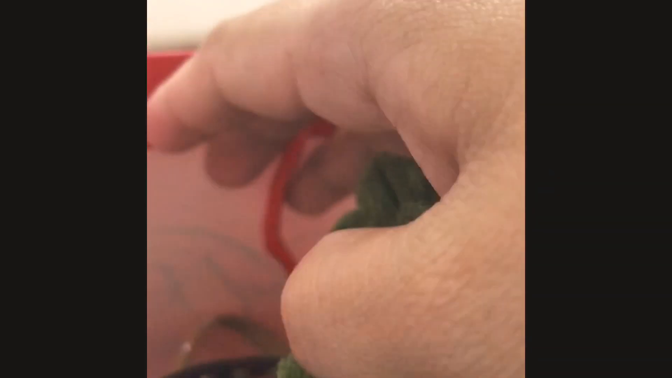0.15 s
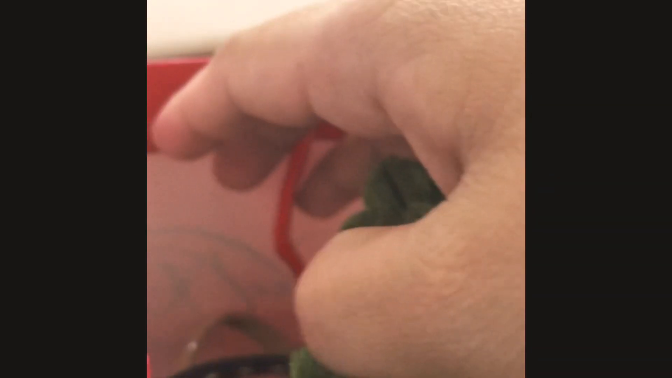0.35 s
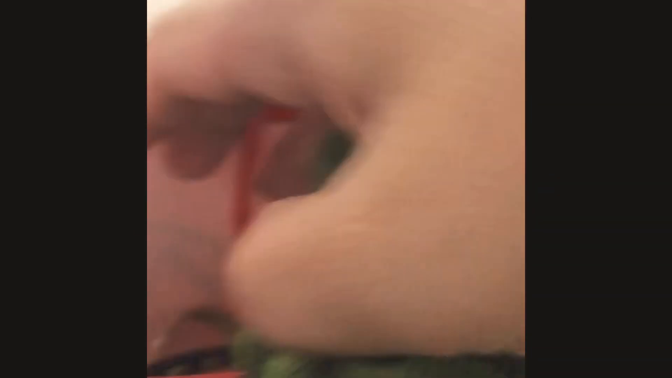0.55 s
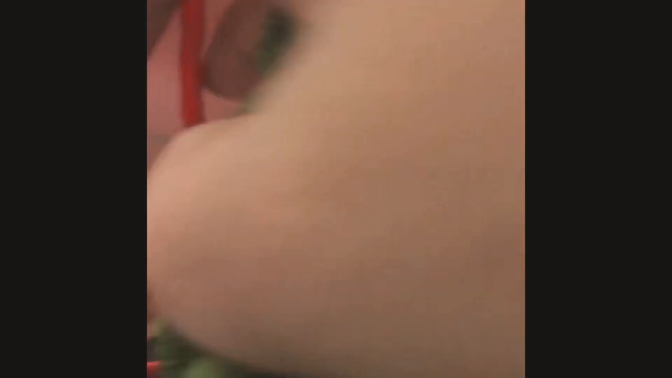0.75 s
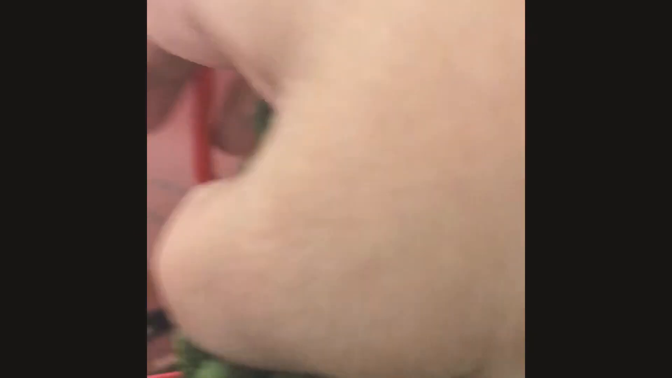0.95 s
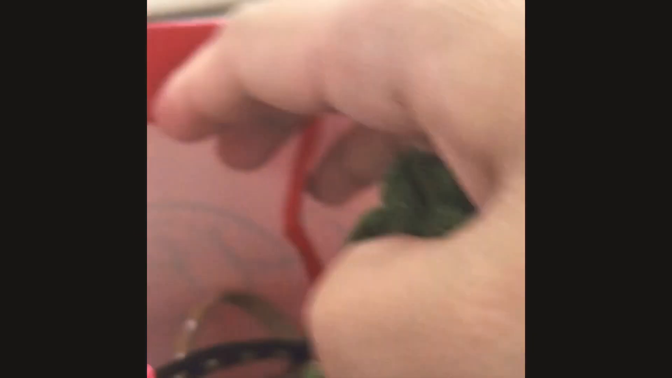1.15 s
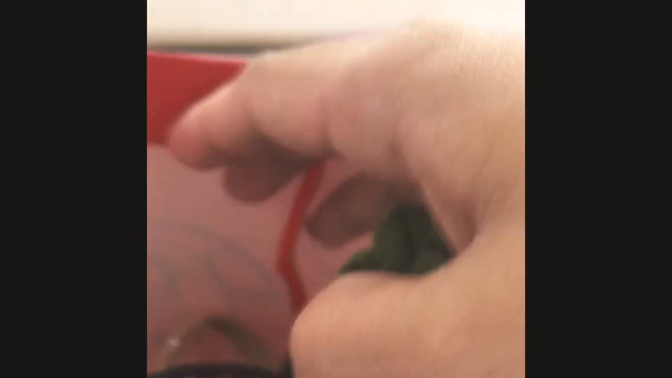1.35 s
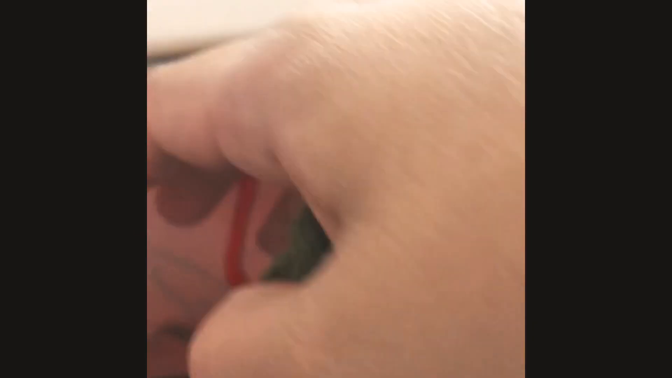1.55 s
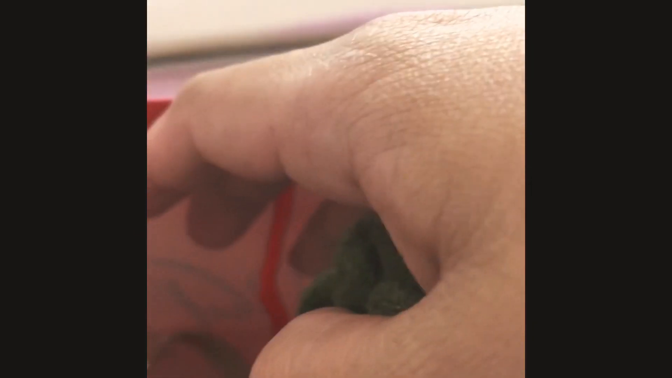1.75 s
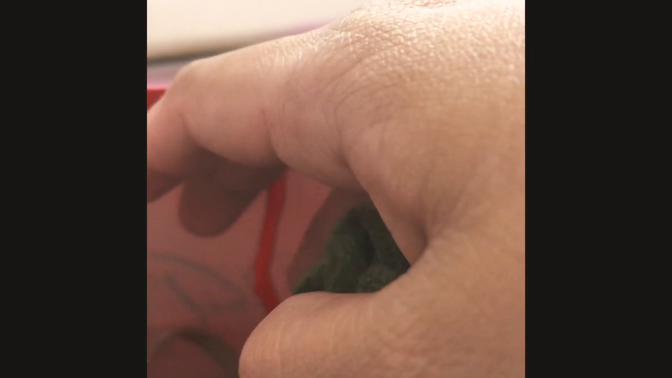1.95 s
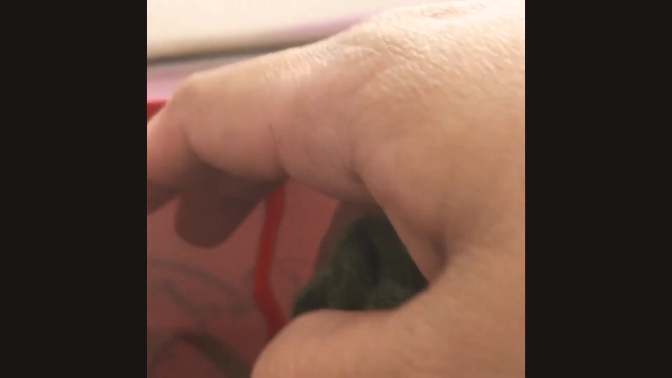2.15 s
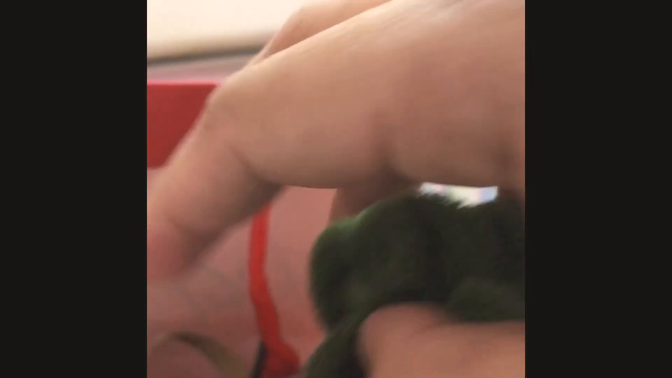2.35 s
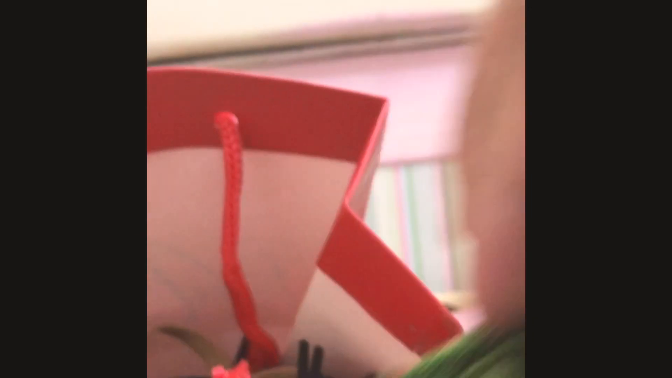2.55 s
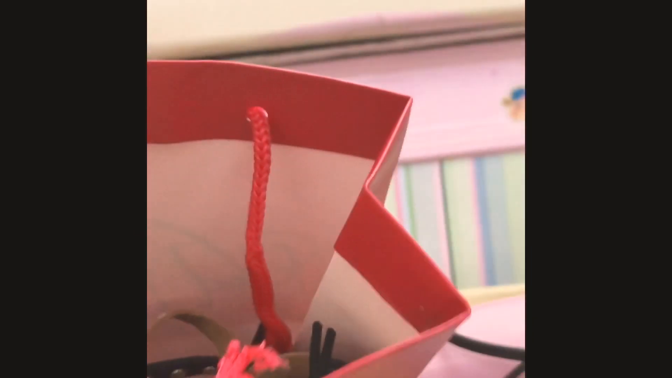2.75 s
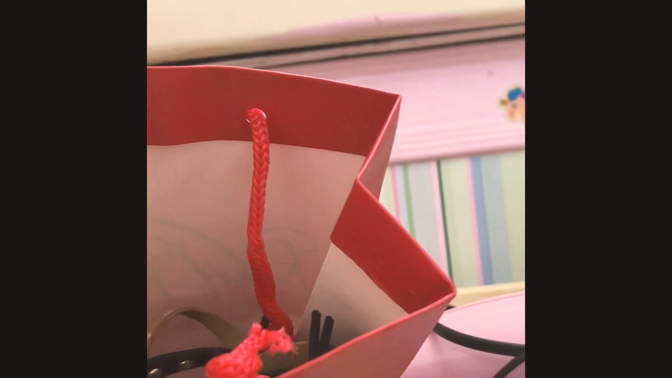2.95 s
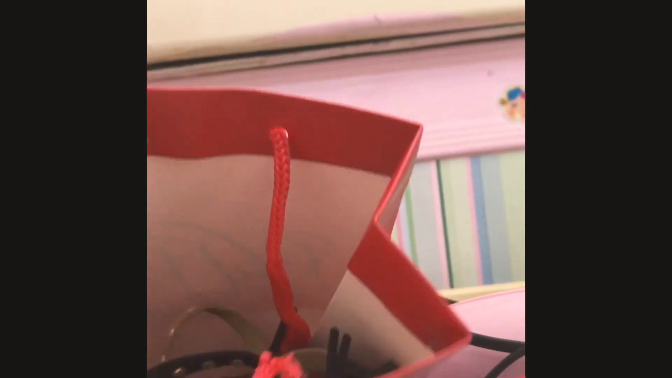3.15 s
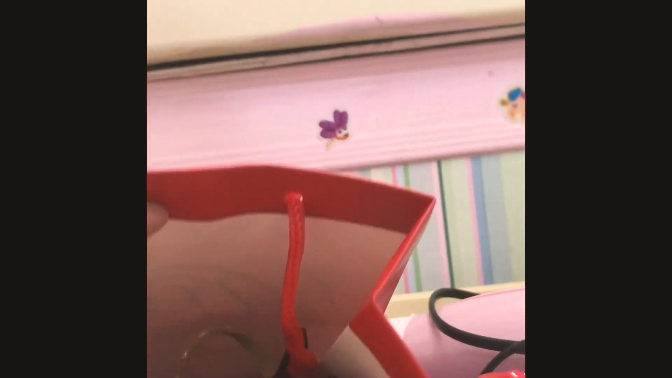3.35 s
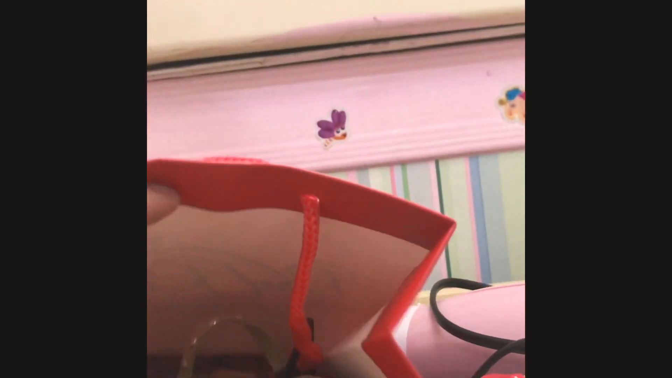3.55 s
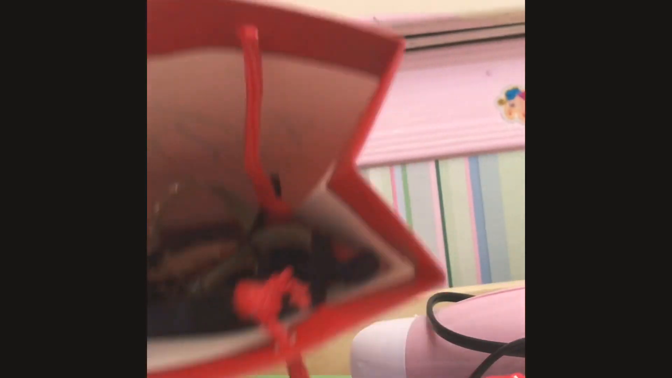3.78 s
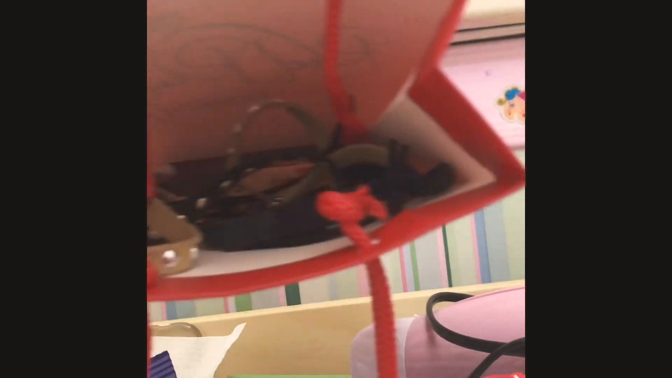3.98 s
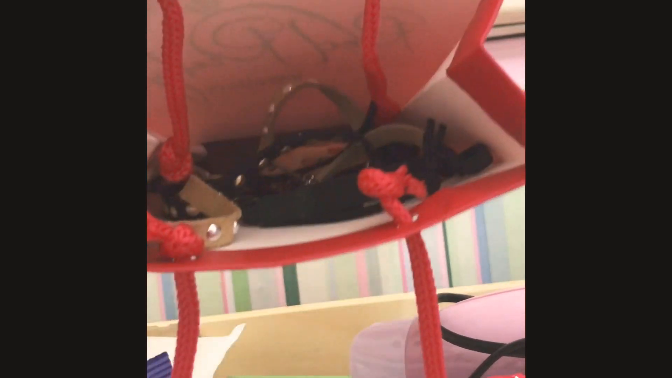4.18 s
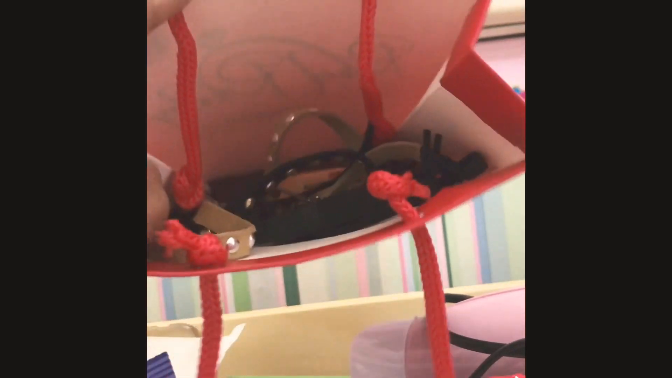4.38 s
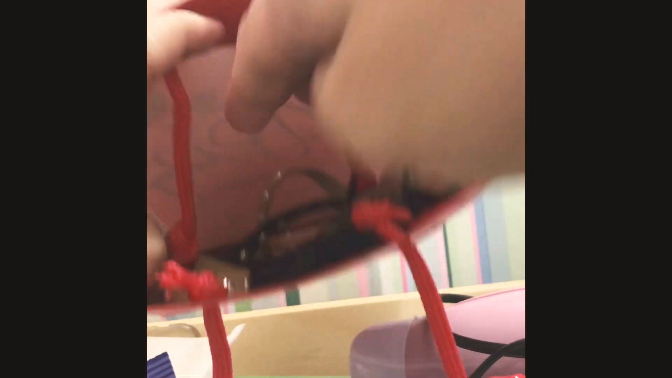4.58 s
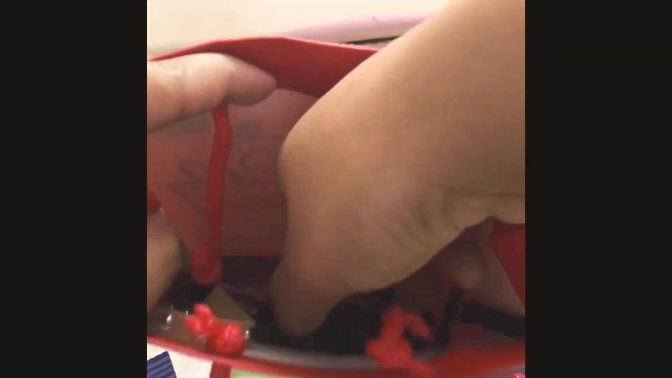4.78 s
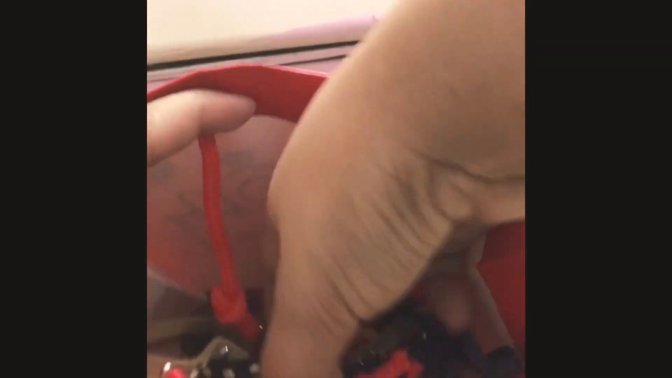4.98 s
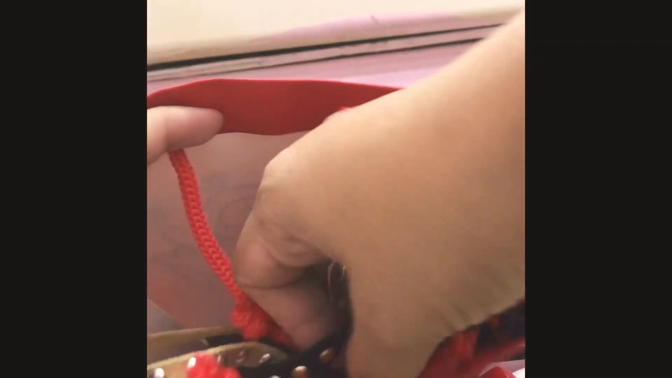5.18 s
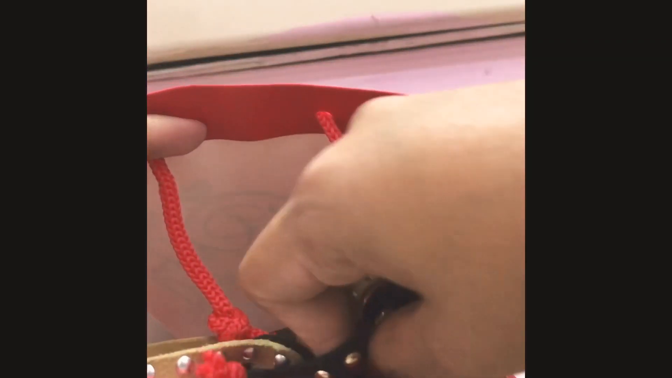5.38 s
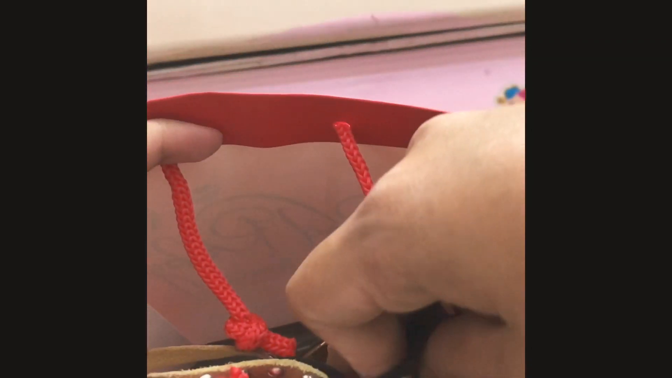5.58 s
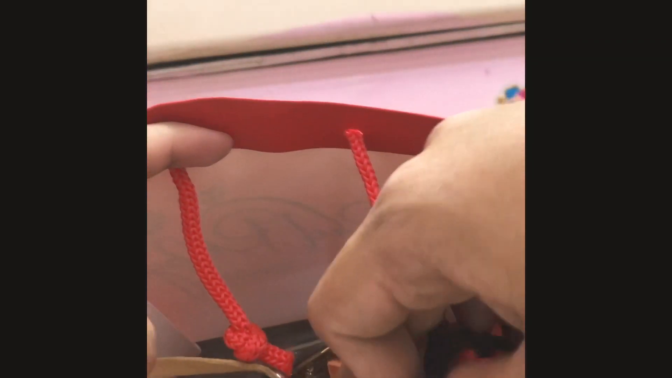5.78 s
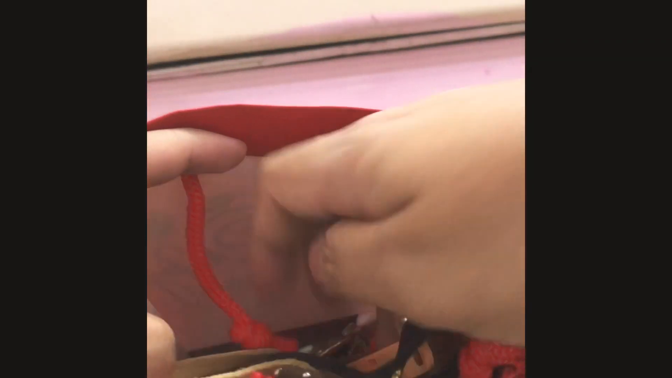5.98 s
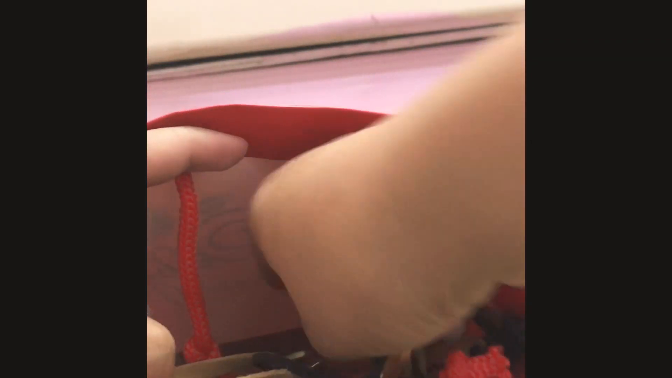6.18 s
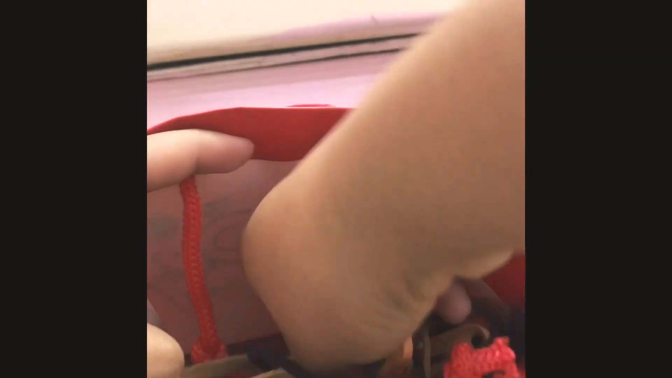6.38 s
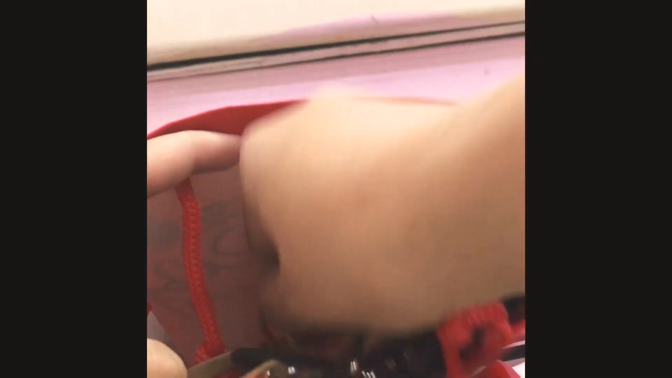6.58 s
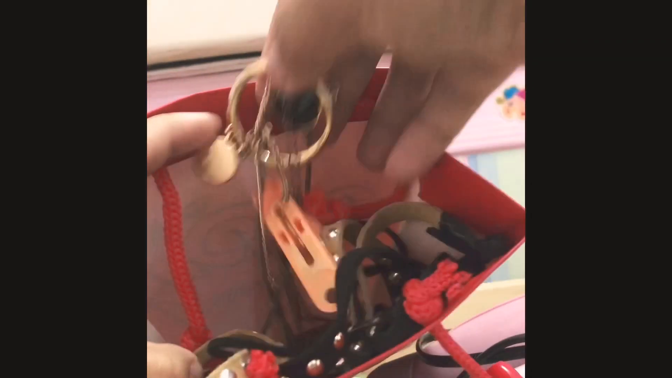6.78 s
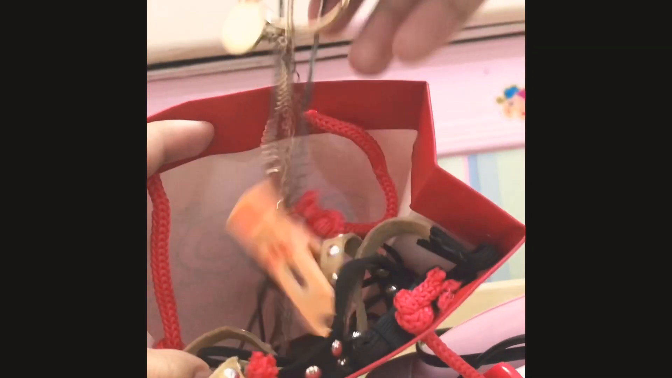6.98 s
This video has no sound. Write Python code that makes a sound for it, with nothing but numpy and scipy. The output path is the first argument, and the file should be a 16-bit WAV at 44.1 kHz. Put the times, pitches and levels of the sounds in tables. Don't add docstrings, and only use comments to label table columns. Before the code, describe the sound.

A dry, close phone pickup in a quiet furnished room, with faint microphone hiss. At 0 s a crisp snap and dull knock, then light knocks around 0.3-0.5 s. At about 0.58 s comes the loudest hit, a hard cracking double snap with a woody thump. Quiet brushing follows; at 1.2-1.5 s hissing rustle swells with knocks and pops. From 1.7 to 2.5 s skin and yarn slide softly over paper. Between 2.6 and 3.7 s creases pop often, with tiny faint cord creaks near 2.7 and 2.9 s and a sharp crack at 3.34 s. It sinks nearly to silence by 3.9-4.5 s. At 4.7 s a strong snap starts vigorous digging, crackles and dull bumps to 5.5 s, then easing, with another crack at 5.9 s. From 6.35 to 7 s, short bright metal clinks chatter over rustling, strongest near 6.45, 6.65 and 6.86 s.

```python
import sys
import numpy as np
from scipy import signal
from scipy.fft import rfft, irfft, next_fast_len
from scipy.io import wavfile
from scipy.ndimage import uniform_filter1d, map_coordinates

SR = 44100
rng = np.random.default_rng(int(sys.argv[2]) if len(sys.argv) > 2 else 0)


def put_to_file(sound):
    columns = np.atleast_2d(sound).T
    safe = np.clip(columns, -1, 1)
    whole_steps = np.round(safe * 32767)
    wavfile.write(sys.argv[1], SR, whole_steps.astype(np.int16))


def gain_from_db(level_db):
    decades = np.asarray(level_db, float) / 20
    return 10 ** decades


N = 310023


def unit(x):
    return x / np.sqrt(np.mean(x ** 2) + 1e-20)


def along(points, hz):
    f, v = np.transpose(points)
    return np.interp(np.log(hz + 1), np.log(f + 1), v)


def wobble(rate):
    return map_coordinates(rng.standard_normal(N // 100), [np.arange(N) * rate / SR])


def filtered(x, response):
    m = next_fast_len(N + SR // 2)
    hz = np.fft.rfftfreq(m, 1 / SR)
    return irfft(rfft(x, m) * response(hz), m)[..., :N]


def add(track, s, sound):
    part = track[max(round(s * SR), 0):][:len(sound)]
    part += sound[:len(part)]


def microphone_hiss():
    return gain_from_db(-84.0) * rng.standard_normal(N)


# pitch in Hz, time to fade by 60 dB in seconds.
ROOM_FADE = [(150, .098), (2000, .17), (12000, .1)]


def room(x):
    hz, t, z = signal.stft(rng.standard_normal(SR // 3), SR, nperseg=256)
    fade = gain_from_db(-60 * t / along(ROOM_FADE, hz)[:, None])
    tail = signal.istft(z * fade, SR, nperseg=256)[1]
    delayed = np.pad(x, (150, 0))
    return signal.fftconvolve(delayed, tail / np.linalg.norm(tail))[:N]


# time in seconds, pitch in Hz, level in dB.
CORD_CREAKS = [
    [(2.645, 520, -52), (2.674, 502, -47), (2.708, 513, -51)],
    [(2.712, 518, -54), (2.735, 527, -56)],
    [(2.888, 500, -57), (2.918, 500, -55)],
]


def squeak():
    out, t, rough = np.zeros(N), np.arange(N) / SR, wobble(60)
    for rows in CORD_CREAKS:
        s, hz_points, db_points = np.transpose(rows)
        hz = np.interp(t, s, hz_points)
        db = np.interp(t, s, db_points)
        alive = np.clip(np.minimum(t - s[0], s[-1] - t) / .006, 0, 1)
        out += alive * gain_from_db(db + 2.5 * rough) * np.sin(2 * np.pi * np.cumsum(hz) / SR)
    return out


# start in seconds, length in seconds, pitch in Hz, width in Hz, level in dB.
FOLD_SCRAPES = [(0.01, 0.04, 2100, 201, -69), (3.203, 0.17, 3280, 1510, -49),
                (5.017, 0.039, 3600, 1820, -42), (5.39, 0.17, 1220, 400, -52),
                (1.495, 0.11, 7440, 1820, -59), (5.162, .022, 1023, 400, -40), (5.11, .04, 1000, 400, -46),
                (6.521, .008, 3300, 1200, -37.5), (2.585, .075, 4100, 500, -56),
                (6.13, .04, 1000, 520, -50.5), (6.358, 0.042, 1100, 1100, -42.5), (6, .016, 800, 500, -43),
                (6.715, 0.034, 1300, 400, -48), (4.76, 0.042, 1300, 204, -49), (4.7, .035, 1900, 300, -50),
                (4.83, .045, 8200, 700, -49)]


def scrapes():
    out = np.zeros(N)
    for s, length, hz, width_hz, db in FOLD_SCRAPES:
        t = np.arange(round(length * SR)) / SR
        smoothing = max(round(SR / width_hz), 1)
        drag = uniform_filter1d(rng.standard_normal(SR // 4), size=smoothing)[:len(t)]
        swell = np.sqrt(np.sin(np.pi * t / length))
        add(out, s, gain_from_db(db + 6.0) * unit(drag) * np.cos(2 * np.pi * hz * t) * swell)
    return out


# start in seconds, peak level in dB, strongest pitch in Hz.
METAL_TOUCHES = [(7, -33.5, 10900), (6.3816, -29, 6730), (6.4058, -28.5, 6730), (6.456, -20.5, 13500),
                 (6.4757, -27.5, 10400), (6.5056, -41, 15100), (6.6477, -16.5, 9470), (6.66, -27, 11000),
                 (6.522, -30, 12800), (6.8636, -21, 9800), (6.8794, -36, 15200), (6.437, -38, 12800),
                 (6.352, -37, 15100)]
# pitch in Hz, level in dB.
METAL_PITCHES = [(4500, -14), (6950, -10), (9453, -2), (9700, -9), (10650, -4), (10900, -8), (12820, -3),
                 (13100, -10), (15130, 0)]


def clinks():
    ring_t60_s, stopped_s = .045, .013
    octave_loss_db, grit_db = 15, -11
    out, t = np.zeros(N), np.arange(SR // 8) / SR
    hz, level = np.transpose(METAL_PITCHES)[:, :, None]
    luck_of_all = rng.standard_normal((len(METAL_TOUCHES), 3, len(METAL_PITCHES), 1))
    for (s, db, near_hz), luck in zip(METAL_TOUCHES, luck_of_all):
        strength = gain_from_db(level + 4 * luck[0] - octave_loss_db * np.abs(np.log2(hz / near_hz)))
        chatter = 1 + .8 * np.cos(2 * np.pi * (130 + 40 * luck[1]) * t + luck[2])
        tones = np.sin(2 * np.pi * hz * (1 + .004 * luck[2]) * t)
        ring = (strength * chatter * tones).sum(0)
        free_s = stopped_s * gain_from_db((db + 20) / 2.5)
        damped = gain_from_db(-60 * t / ring_t60_s) / (1 + (t / free_s) ** 8) + .06 * gain_from_db(-60 * t / .12)
        grit = gain_from_db(grit_db - 60 * t / .025) * np.diff(rng.standard_normal(len(t) + 1))
        attack = 1 - np.exp(-t / .0009)
        add(out, s, gain_from_db(db + 5.5) * attack * (damped * ring / np.abs(ring).max() + grit / 3))
    return out


# start in seconds, snap level in dB, panel pitch in Hz, knock level in dB, knock pitch in Hz.
HEAVY_BLOWS = [(.0024, -17, 1690, -20, 330), (.3244, -31.5, 2480, -26.5, 274),
               (.3386, -41, 1700, -26.5, 71.6), (0.4876, -31.5, 1310, -45, 152),
               (0.5314, -28.5, 1630, -42, 267), (0.5834, -0.2, 1750, -33, 899), (0.586, -8, 1660, -24, 899),
               (0.5873, -20, 1290, -8.5, 440), (0.6099, -15.5, 1367, -11, 326),
               (1.173, -23.5, 1470, -37.5, 370), (1.3404, -10, 1280, -20.5, 470),
               (1.346, -13.5, 1315, -19.5, 164), (1.4378, -40, 1690, -35.5, 123),
               (1.4761, -21.5, 1350, -26, 218), (1.5075, -33, 1340, -35, 80),
               (2.395, -27.5, 2090, -35, 894), (2.8498, -33, 2170, -39.5, 706),
               (3.1699, -17, 5300, -39.5, 652), (4.6895, -10.5, 3060, -26.5, 240),
               (4.7512, -17, 3650, -26.5, 343), (5.1032, -18.5, 2480, -33, 885),
               (5.171, -47, 2280, -34.5, 848), (5.4882, -18.5, 1440, -33, 363),
               (6.3823, -19, 6050, -29, 630)]
# start in seconds, snap level in dB, panel pitch in Hz, knock level in dB.
POPPING_FOLDS = [(5.9022, -18, 1550, -50), (4.69, -20, 1100, -45), (.93, -46, 1500, -60),
                 (.445, -52, 2700, -60), (1.3425, -30, 1300, -24), (.2593, -45, 1960, -52.5),
                 (.894, -33.5, 2800, -57), (1.1616, -26.5, 1440, -45), (6.6254, -19, 1270, -39),
                 (2.578, -28.5, 1430, -46), (2.7537, -27, 1500, -44), (2.798, -31, 1870, -50),
                 (2.8633, -20, 1250, -45), (2.9923, -43, 1340, -40), (3.207, -24.5, 1420, -45.5),
                 (3.256, -20.5, 1480, -41), (3.395, -27, 1560, -51), (3.484, -25.5, 1600, -37.5),
                 (3.5251, -25, 3360, -45.5), (3.549, -30, 1730, -61), (3.6486, -20, 1200, -44),
                 (6.5203, -14, 3470, -41.5), (4.873, -17, 2930, -39), (4.9107, -19, 1340, -32),
                 (5.3422, -15.5, 6300, -47), (6.1193, -34, 1370, -53), (6.2381, -23, 4340, -33),
                 (6.2724, -44, 1730, -49), (6.3545, -21, 4200, -33), (6.4074, -28, 6400, -45),
                 (6.4845, -19, 5200, -40), (6.9501, -25, 4700, -35.5), (5.3746, -15, 1860, -30.5),
                 (6.864, -33, 6640, -42), (.5861, -2, 3100, -59)]
# start in seconds, snap level in dB, panel pitch in Hz, knock level in dB.
SHARP_CRACKS = [(0.5876, -7, 12760, -60), (.7995, -44, 7500, -75), (.837, -40, 2780, -35.5),
                (0.9512, -37.5, 2000, -66), (1.1266, -55, 1410, -43), (2.196, -37, 7080, -68),
                (2.3352, -22, 3160, -38.5), (2.708, -32, 1360, -66), (3.3399, -7, 1550, -34),
                (3.427, -28, 2880, -43.5), (3.6237, -28, 4300, -53), (3.9985, -34.5, 6500, -68),
                (4.155, -46.5, 1520, -65), (4.343, -38, 4430, -47.5), (4.7944, -27, 1760, -34.5),
                (4.8283, -22, 3480, -39), (4.9208, -16, 5500, -29.5), (4.946, -16, 3600, -57),
                (4.9974, -15.5, 5080, -60), (5.3561, -14, 5600, -38.5), (5.375, -14, 6930, -59),
                (5.902, -10.5, 2980, -40), (6.0053, -20, 4500, -75), (6.0223, -26, 3880, -54),
                (6.3007, -53, 4010, -33.5), (6.457, -23.5, 1380, -48), (6.4937, -21.5, 1460, -46.5),
                (3.7184, -26, 4400, -55), (1.9725, -26.5, 9500, -61), (6.647, -25, 4570, -49)]
# start in seconds, snap level in dB.
FAINT_TICKS = [(.742, -51), (3.1, -36.5), (2.937, -33), (3.016, -38), (3.3, -37), (3.072, -36), (3.2, -42),
               (2.92, -42), (2.5, -47), (5.83, -41), (5.852, -37), (6.81, -33), (5.235, -31.5),
               (5.158, -34)]
# start in seconds, peak level in dB, pitch in Hz.
BRIGHT_PINGS = [(0.0174, -52, 3570), (0.0274, -58, 3680), (0.2714, -59, 3710), (0.3042, -43, 3880),
                (0.3324, -48, 4130), (0.3404, -49, 3750), (0.4693, -42, 3770), (0.5043, -49, 4380),
                (0.5144, -45, 3550), (0.6844, -50, 8040), (0.8224, -35, 3770), (0.8544, -47, 3600),
                (0.9114, -51, 4340), (1.5694, -33, 7380), (1.6194, -45, 5200), (1.6386, -47, 3680),
                (1.7205, -33, 5190), (2.0566, -35, 9070), (2.7214, -32, 3750), (2.7433, -27.5, 4220),
                (2.8632, -25, 4000), (3.0964, -42, 4440), (3.5096, -32, 3680), (3.6994, -26, 4870),
                (3.8081, -42, 6070), (4.1059, -57, 4360), (4.2321, -52, 8710), (4.275, -49, 5640),
                (4.3663, -45, 5480), (4.8544, -22, 7640), (5.0726, -25, 6830), (5.0884, -24, 4100),
                (5.3174, -34, 6630), (6.0874, -40, 3520), (6.1195, -33, 4450), (6.2207, -26, 4210),
                (6.3422, -24, 5540), (6.3724, -20.5, 4490), (6.3914, -25, 6740), (6.451, -19, 12600),
                (6.5031, -21, 3680), (6.6052, -28, 4400), (6.8224, -23, 9840), (6.8424, -21, 9470),
                (6.8774, -28, 9710), (6.8864, -28, 8770), (7.002, -28, 7700)]


def creases():
    blow_crack_db, fold_crack_db, sharp_crack_db, ping_crack_db = -41, -20.5, -6.5, -12
    fold_knock_hz, sharp_knock_hz = 464, 402
    blows = [(s, db, hz, blow_crack_db, knock_db, knock_hz) for s, db, hz, knock_db, knock_hz in HEAVY_BLOWS]
    folds = [(s, db, hz, fold_crack_db, knock_db, fold_knock_hz) for s, db, hz, knock_db in POPPING_FOLDS]
    cracks = [(s, db, hz, sharp_crack_db, knock_db, sharp_knock_hz) for s, db, hz, knock_db in SHARP_CRACKS]
    ticks = [(s, db, 3600, sharp_crack_db, db - 12.5, sharp_knock_hz) for s, db in FAINT_TICKS]
    pings = [(s, db - 5.5, hz, ping_crack_db, db - 30, sharp_knock_hz) for s, db, hz in BRIGHT_PINGS]
    return blows + folds + cracks + ticks + pings


# pitch in Hz, level in dB.
WALL_TONE = [(30, -15.5), (70, 1.5), (1000, 1.5), (3000, -4), (8000, -12.5)]
# start in seconds, peak level in dB, strongest pitch in Hz.
HAND_BUMPS = [(2.29, -46, 90), (2.47, -48, 110), (2.56, -42, 75), (3.9, -61, 75), (4.2, -62, 70),
              (.597, -26, 200), (.59, -23.5, 70.1), (1.05, -51, 70), (.01, -37, 70), (0.046, -52, 110),
              (0.088, -49.5, 135), (0.351, -37.5, 320), (0.369, -37.5, 109), (0.434, -44, 102),
              (0.841, -36, 83.4), (1.074, -50, 291), (1.26, -39, 332), (1.519, -57, 72.7),
              (1.584, -42, 106), (1.79, -40, 206), (2.235, -41, 139), (2.26, -39, 283), (2.499, -46.5, 188),
              (2.531, -35.5, 169), (2.763, -38.5, 270), (4.86, -29, 268), (4.999, -35, 641),
              (5.058, -33.5, 232), (5.261, -35, 373), (5.306, -39, 323), (5.457, -39.5, 393),
              (2.343, -36.5, 147), (4.088, -53, 234), (4.539, -51, 260), (5.939, -54.5, 280),
              (6.035, -45, 283), (6.111, -37, 268)]


def knocks(travel_s):
    out, hz = np.zeros(N), np.fft.rfftfreq(4096, 1 / SR)
    blows = [(s, db, top_hz) for s, *_, db, top_hz in creases()]
    blows += [(s + 0.00517, db, top_hz) for s, db, top_hz in HAND_BUMPS]
    for (s, db, top_hz), luck in zip(blows, rng.random((len(blows), 6))):
        paths = 1 + np.cumsum(np.r_[0, .35 + .9 * luck[1:]])[:, None]
        lag = 2 * travel_s * np.sqrt(300 * hz) * paths
        first = travel_s * np.sqrt(300 / 3000) * hz
        waves = (gain_from_db(-7 * (paths - 1)) * np.exp(-2j * np.pi * (lag - first))).sum(0)
        pitch = hz / top_hz
        blow = pitch / (1 - pitch ** 2 + 1.1j * pitch)
        blow /= 1 + (pitch / 4) ** 2
        sound = np.roll(irfft(waves * blow * gain_from_db(along(WALL_TONE, hz))), 64)
        add(out, s - 64 / SR, gain_from_db(db + 3) * sound / np.abs(sound).max())
    return out


def snaps():
    ring_cycles, ring_s = 7.9, 0.0016
    rattle_db, rattle_s = -6, 0.02
    crack_edge = .5
    events = creases()
    out, t = np.zeros(N), np.arange(700) / SR
    for (s, db, hz, bright_db, *_), noise in zip(events, rng.standard_normal((len(events), 3, len(t)))):
        t60 = ring_cycles / hz + ring_s
        side_hz = hz * np.array([.7, 1.4, 1.9]) * (1 + 0.12 * noise[2, :3])
        side_hz = np.minimum(side_hz, 15000)[:, None]
        neighbours = np.sin(2 * np.pi * side_hz * t + 3 * noise[2, 3:6, None]).sum(0)
        modes = np.sin(2 * np.pi * hz * t) + gain_from_db(-10) * neighbours
        panel = modes * gain_from_db(-60 * t / t60) * (1 - np.exp(-t / 0.00021))
        crack = noise[0] - crack_edge * np.roll(noise[0], 2)
        crack *= gain_from_db(-60 * t / 0.0036) * (1 - np.exp(-t / 0.00018))
        crack *= gain_from_db(bright_db + 2.5) / np.abs(crack).max()
        rattle = uniform_filter1d(noise[1], size=12) * np.cos(2 * np.pi * hz * t)
        rattle *= gain_from_db(rattle_db - 60 * t / rattle_s)
        add(out, s, gain_from_db(db + 0.58) * (panel + crack + rattle))
    return filtered(out, lambda hz: (1j * hz / 700) ** 2 / (1 + 1j * hz / 700) ** 2)


# time of most
# pressure in seconds, level in dB, seconds to swell 20 dB, seconds to fade 20 dB, brightness in dB.
HAND_STROKES = [(.182, -54, .07, .09, -1), (.51, -61, 0.24, 0.4, -13), (.84, -54, .07, .05, 3),
                (1.04, -64.5, 0.63, -0.2, -10.5), (.02, -62, 4, .03, -6), (.095, -68, .03, .03, -8),
                (.665, -68, .03, .04, 3), (.78, -66, .05, 0.34, 0), (1.3, -51, .06, 0.06, 5),
                (1.345, -42.5, 0.07, 0.05, -3), (2.05, -55, .7, .9, 8), (2.39, -48.5, 0.3, 0.4, 0.5),
                (2.745, -51, .11, .05, 6), (2.93, -53, 0.75, 0.8, -4), (3.16, -53.5, 0.6, 0.54, 7),
                (3.66, -51.5, 0.5, 0.22, -2), (3.82, -58, 0.1, 0.4, 9.5), (4.004, -60.5, 0.1, 0.06, 10),
                (4.16, -66.5, 1, 9.5, -8.5), (4.512, -49, 0.23, 0.12, 7.5), (4.62, -63, 0.5, 4, 1),
                (4.863, -39.5, .22, .25, 3), (4.975, -36, .12, 0.2, 12), (5.26, -44, 0.42, 0.43, 0),
                   (5.53, -50, 0.4, 0.6, -2.5), (6.04, -52.5, .02, -0.5, 7), (6.15, -51, 0.34, 0.1, -15.5),
                   (6.23, -48.5, 0.3, 0.2, 6), (6.57, -49.5, 0.03, 9, 10.5), (6.64, -43, -0.1, 0.6, 7),
                   (6.9, -50.5, 0, 6, 1), (7.025, -48, 0.16, 9, 15), (6.96, -47.5, .05, -0.4, 0)]
# start in seconds, level in dB, seconds to fade 20 dB, brightness in dB.
JERKED_STROKES = [(.595, -49, .1, 8), (5.088, -41, .15, 7), (4.79, -49, 0.34, 0), (1.162, -46.5, .3, -4),
                  (1.488, -44, 0.27, -12), (1.723, -45, 0.46, 7.5), (2.205, -49.5, 0.27, 16.5),
                  (3.35, -45.5, 0.31, 5), (4.693, -41, 0.34, 5.5), (5.385, -43.5, 0.14, 2),
                  (5.7, -49.5, 0.53, 5), (6.33, -50, 0.7, -2), (6.453, -40.5, 0.23, -1)]
# end in seconds, level in dB, seconds to swell 20 dB, brightness in dB.
LIFTED_STROKES = [(.23, -58, .1, -3), (.386, -56, .15, -6), (1.232, -52, .15, 0), (1.445, -40, 0.22, 3),
                  (2.665, -52.5, 0.26, 11.5), (.637, -53.5, 0.08, 3.5), (5.047, -41, .2, 10),
                  (5.2, -46, .35, 8), (6.45, -48, .15, 4), (6.325, -52, 0.23, 0), (6.54, -47, .1, 0),
                  (5.7, -45, .05, 4), (6.415, -44.5, 0.06, 3), (6.785, -42, .2, 8)]


def pressure(per_bright):
    catch_s, lift_s = .008, .016
    t = np.arange(0, N, 64) / SR
    jerked = [(s, db, catch_s, fade_s, bright_db) for s, db, fade_s, bright_db in JERKED_STROKES]
    lifted = [(s, db, swell_s, lift_s, bright_db) for s, db, swell_s, bright_db in LIFTED_STROKES]
    strokes = [*HAND_STROKES, *jerked, *lifted]
    s, db, swell_s, fade_s, bright_db = np.transpose(strokes)[:, :, None]
    shape_db = -20 * np.where(t < s, (s - t) / np.abs(swell_s), (t - s) / np.abs(fade_s))
    power = (gain_from_db(db + per_bright * bright_db + shape_db) ** 2).sum(0)
    return np.interp(np.arange(N) / SR, t, 10 * np.log10(power + 1e-12))


def scratch(spectrum, grit_db, clump_db, rate, patchy_db):
    grit = grit_db * np.minimum(rng.exponential(size=N), 5)
    catches = rng.standard_normal(N) * gain_from_db(grit + clump_db * wobble(rate))
    z = signal.stft(catches, nperseg=256)[2]
    field = uniform_filter1d(rng.standard_normal(z.shape), size=3, axis=0)
    field = uniform_filter1d(field, size=18, axis=1)
    patchy = signal.istft(z * gain_from_db(patchy_db * unit(field)), nperseg=256)[1][:N]
    return unit(filtered(patchy, lambda hz: gain_from_db(along(spectrum, hz))))


def crackle(level_db, spread_db, count):
    when, tone, life, size = rng.random((count, 4)).T
    start, t = (when * (N - 200)).astype(int), np.arange(128) / SR
    hz = (2600 * 5.5 ** tone)[:, None]
    ticks = np.sin(2 * np.pi * hz * t) * np.exp(-t * hz / (1.0 + 1.8 * life[:, None]))
    ticks *= gain_from_db(level_db[start] - spread_db * np.log(0.023 + size))[:, None]
    places = start[:, None] + np.arange(len(t))
    return np.bincount(places.ravel(), ticks.ravel(), N)


# pitch in Hz, level in dB per Hz.
HISS_COLOUR = [(1470, -40), (2500, -3), (6920, -4), (7730, -5), (10400, -8), (15100, -10.5), (16100, -10),
               (16500, -37)]
# pitch in Hz, level in dB per Hz.
BODY_COLOUR = [(260, -32), (450, -2.5), (643, -5.5), (835, -16), (951, 1), (1550, 0), (3380, -9.5),
               (6000, -16), (7800, -33.5), (13200, -120)]
# pitch in Hz, level in dB per Hz.
RUMBLE_COLOUR = [(21, -51.5), (35, -5), (70, -7), (220, -4), (295, 4), (370, -5), (600, -2), (1000, -6),
                 (1300, -31.5), (2200, -120)]


def slide():
    hiss_db = pressure(0.45)
    body_db = pressure(-0.091) - 1.5
    rumble_db = pressure(-.45) - 1.5
    grip = 1.2 * wobble(26)
    hiss = scratch(HISS_COLOUR, grit_db=1.5, clump_db=2, rate=150, patchy_db=2.4)
    body = scratch(BODY_COLOUR, grit_db=1.5, clump_db=2.5, rate=90, patchy_db=3)
    rumble = scratch(RUMBLE_COLOUR, grit_db=1.1, clump_db=1.6, rate=40, patchy_db=1.6)
    hiss *= gain_from_db(hiss_db - 1.5 + 1.2 * grip)
    body *= gain_from_db(body_db - 1.1 + 1.2 * grip)
    rumble *= gain_from_db(rumble_db - 1.1 + 1.1 * grip)
    return hiss + body + rumble + crackle((hiss_db + body_db) / 2 + 2.5, spread_db=4.0, count=1400)


def scene():
    hits = snaps() + knocks(travel_s=.005) + clinks()
    echo = gain_from_db(-24) * room(hits)
    return (microphone_hiss() + echo + squeak() + scrapes() + hits + slide())[None]


def roll_off(x):
    return signal.sosfilt(signal.butter(12, 17000, fs=SR, output="sos"), x)


def record(dry):
    def microphone(hz):
        below_top = np.clip((15900 + 150 - hz) / 300, 0, 1) ** 2
        return (gain_from_db(-36.0) + below_top) / (1 + (45 / (hz + 1)) ** 4)

    return roll_off(filtered(dry, microphone))


dry = scene()
out = record(dry)
put_to_file(out)
```